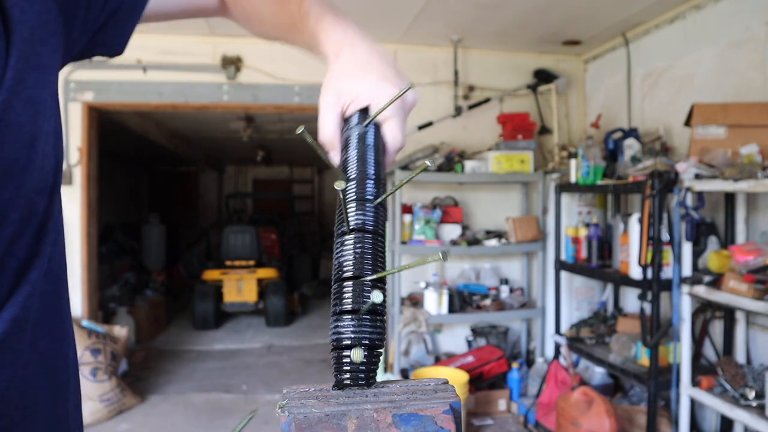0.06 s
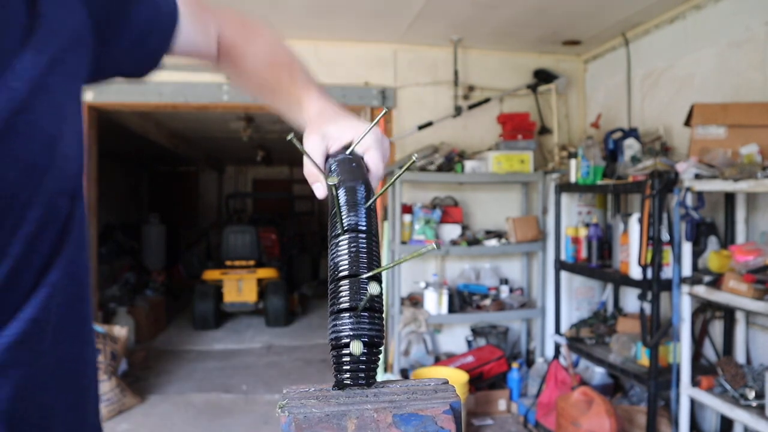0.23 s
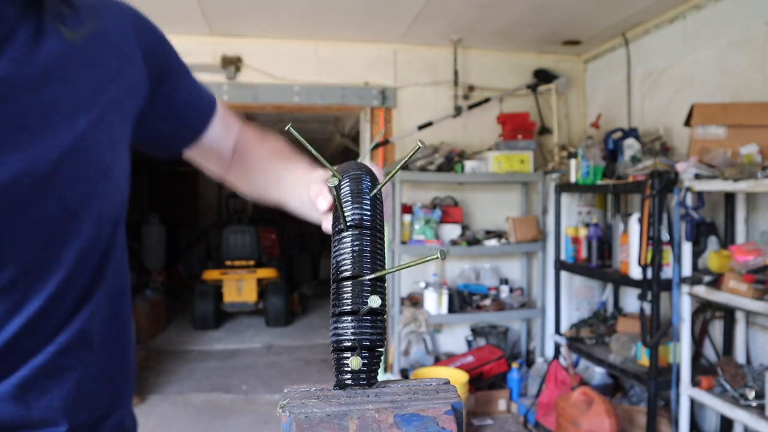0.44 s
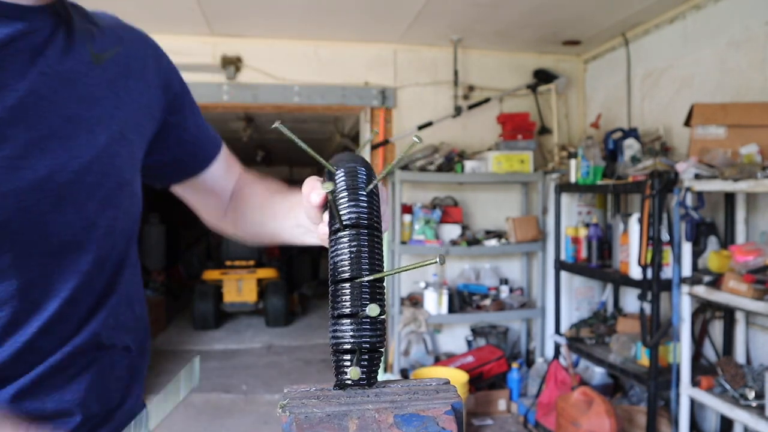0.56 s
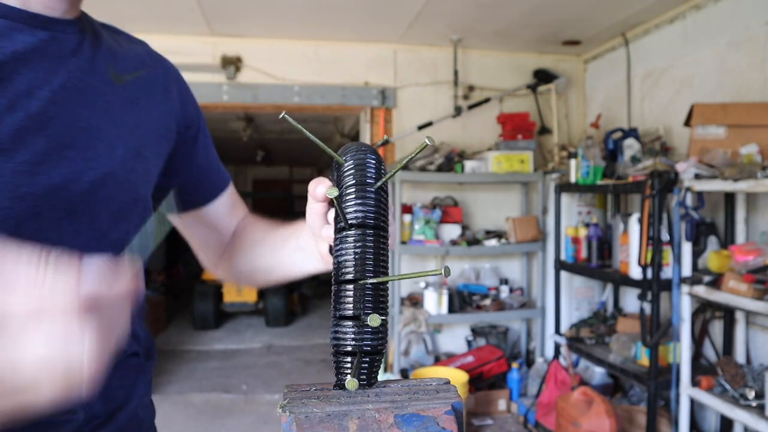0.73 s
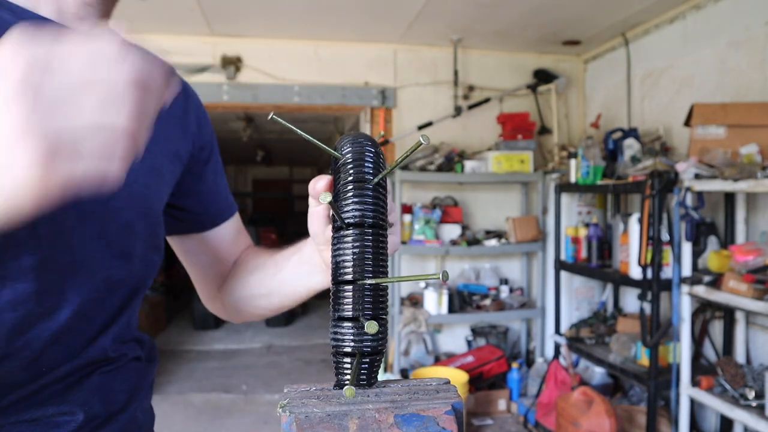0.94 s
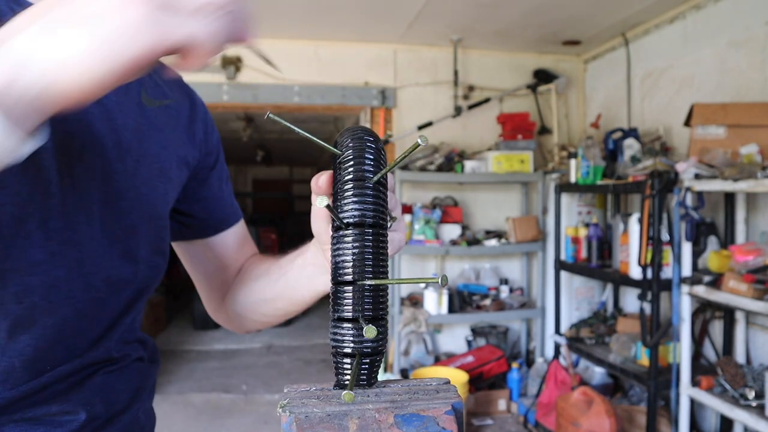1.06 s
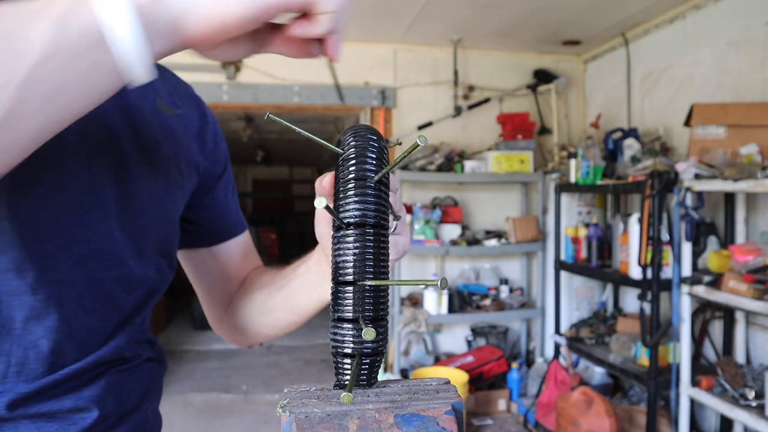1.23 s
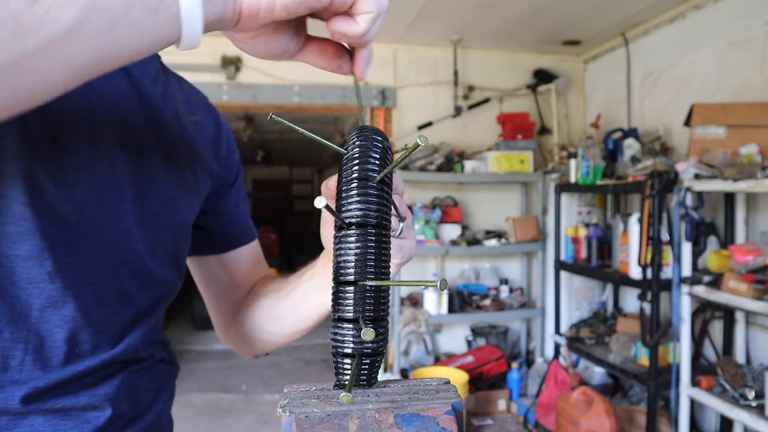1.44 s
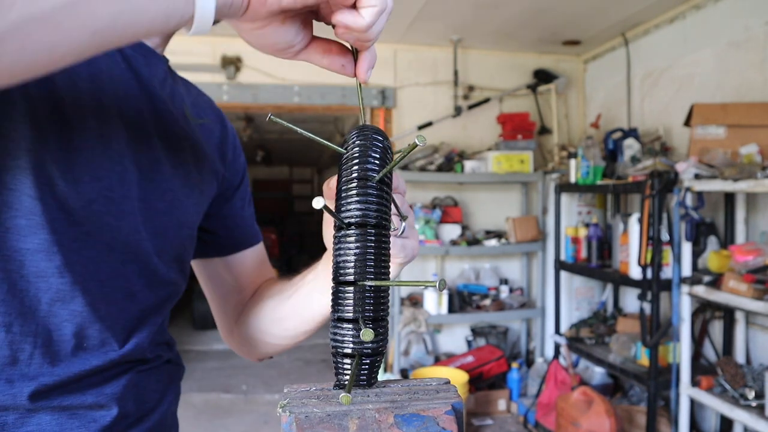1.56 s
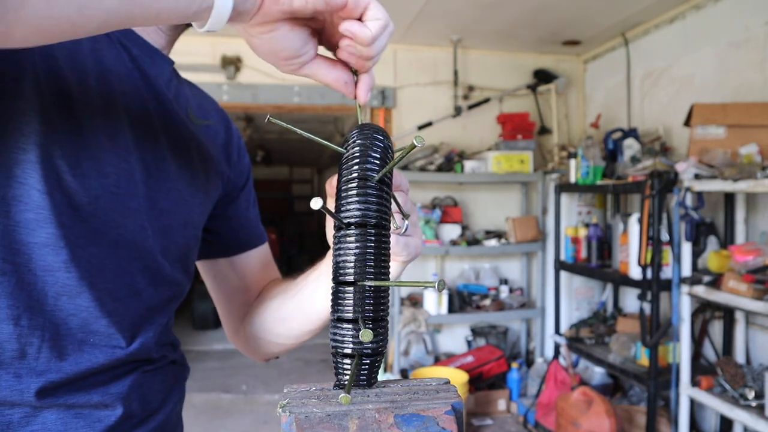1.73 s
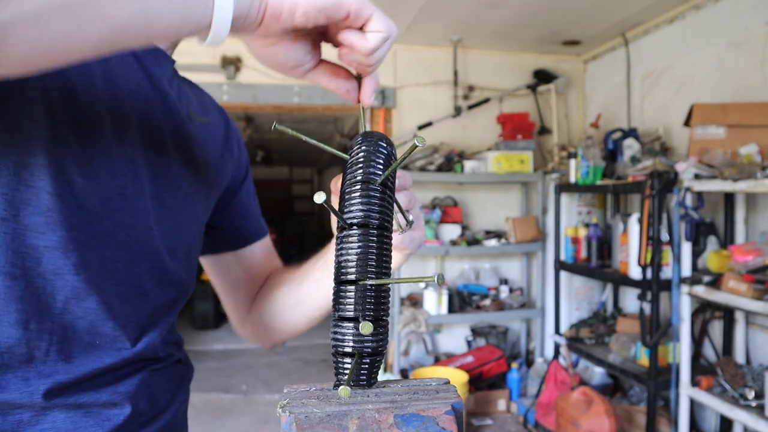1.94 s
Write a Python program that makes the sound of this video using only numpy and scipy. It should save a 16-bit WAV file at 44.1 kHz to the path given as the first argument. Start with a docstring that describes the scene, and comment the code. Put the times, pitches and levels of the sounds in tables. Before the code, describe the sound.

Sharp ringing snaps from a steel spring being bent by hand, followed by faint rubbing.

```python
"""A steel coil spring clamped in a vice is bent over by hand in a quiet garage workshop.
First its turns scrape and groan. From 0.26 to 0.7 s they slip past each other in sharp snaps that
ring the wire and set the spring wobbling, with hollow knocks and dull thuds against the hand.
A duller clink follows at 0.87 s. Then the hand shifts its grip: quiet rubbing, soft taps, small
ticks and a faint squeak, over a low throb that lingers to the end."""
import sys
import numpy as np
from scipy import signal
from scipy.fft import rfft, irfft
from scipy.io import wavfile
from scipy.ndimage import uniform_filter1d

SR = 44100
rng = np.random.default_rng(int(sys.argv[2]) if len(sys.argv) > 2 else 0)


def file_out(sig):
    """Save sig as 16-bit WAV at sys.argv[1]."""
    # one column per channel
    cols = np.atleast_2d(sig).T
    # limit, then scale
    lim = np.clip(cols, -1, 1)
    pcm = np.round(lim * 32767).astype(np.int16)
    wavfile.write(sys.argv[1], SR, pcm)


N = 88200
BURST_GAIN_DB = 17  # added to the levels of ticks and snaps


def amp(db):
    """Decibels to gain."""
    return 10 ** (np.asarray(db) / 20)


def unit(x):
    """Scales to rms 1."""
    return x / np.sqrt(np.mean(x ** 2) + 1e-20)


def curve_at(points, hz):
    """Reads a curve on a log-frequency axis."""
    f, value = np.transpose(points)
    return np.interp(np.log(hz + 1), np.log(f + 1), value)


def fader(points):
    """Level automation as a gain for every sample, silent outside its points."""
    s, db = np.transpose(points)[:2]
    return amp(np.interp(np.arange(N) / SR, s, db, left=-120, right=-120))


def add(mix, s, sound):
    """Mixes a sound in at time s."""
    part = mix[max(round(s * SR), 0):][:len(sound)]
    part += sound[:len(part)]


def eq(x, points, size=4096):
    """Minimum-phase EQ through points of (frequency [Hz], gain [dB])."""
    hz = abs(np.fft.fftfreq(size, 1 / SR))
    log_gain = np.log(amp(curve_at(points, hz)))
    response = np.exp(np.conj(signal.hilbert(log_gain)))
    impulse = np.fft.ifft(response).real[:size // 2]
    return signal.fftconvolve(x, impulse)[:len(x)]


def resonate(x, hz, width_hz):
    """A resonance of gain 1, steady or gliding."""
    carrier = np.exp(2j * np.pi * np.cumsum(hz * np.ones(len(x))) / SR)
    pole = np.exp(-np.pi * width_hz / SR)
    return 2 * (carrier * signal.lfilter([1 - pole], [1, -pole], x / carrier + 1e-18)).real


def steep_band(x, hz, width_hz):
    """Two equal resonances in series."""
    return resonate(resonate(x, hz, width_hz), hz, width_hz)


def waver(hz, drift_hz):
    """A tone of steady strength whose pitch wanders by drift_hz rms."""
    drift = unit(uniform_filter1d(rng.standard_normal(N), size=700))
    return np.sqrt(2) * np.sin(2 * np.pi * (np.cumsum(hz + drift_hz * drift) / SR + rng.random()))


def stick_slip(per_s, spread_db):
    """Friction: random tiny impulses, a few of them large."""
    size = amp(spread_db * np.minimum(rng.exponential(1, N), 4))
    return size * rng.choice([-1, 1], N) * (rng.random(N) < per_s / SR)


def burst(decay_s, size=2048):
    """One slip: a dying chatter of contacts, whitened and scaled to energy 1."""
    fade = np.exp(-(np.arange(size) / SR / decay_s))
    spectrum = rfft(rng.standard_normal(size) * fade)
    chatter = irfft(spectrum / (abs(spectrum) + 1e-9)) * np.sqrt(fade)
    return chatter / np.linalg.norm(chatter)


def hit_envelope(t, attack_s, decay_s):
    """A rounded attack into an exponential decay."""
    return (1 - np.exp(-t / attack_s)) * np.exp(-t / decay_s)


# room tone EQ: (frequency [Hz], gain [dB])
ROOM_TONE_EQ = [(30, 0.5), (100, -4), (250, -6), (700, -11), (1200, -15.5), (4000, -18.5), (16000, -23.5)]

def room_tone(level_db=-54.5):
    """A quiet bed of dark noise."""
    return amp(level_db) * unit(eq(rng.standard_normal(N), ROOM_TONE_EQ))


# reverb time: (frequency [Hz], t60 [s])
GARAGE_DECAY = [(100, 0.69), (500, 0.28), (1500, .3), (4000, 0.33), (7000, 0.29), (16000, 0.22)]
# reverb return EQ: (frequency [Hz], gain [dB])
GARAGE_EQ = [(100, -3.5), (400, 3), (1000, -2), (3000, -1), (5500, 1.5), (8000, -2), (12000, -1)]

def garage(send, return_db=-10.5, gap_s=.004, echoes_per_s=4000):
    """Scattered reflections from shelves and walls, each band dying at its own speed."""
    echoes = rng.standard_normal(SR) * (rng.random(SR) < echoes_per_s / SR)
    hz, t, bands = signal.stft(echoes, SR, nperseg=256)
    fade = amp(-60 * t / curve_at(GARAGE_DECAY, hz)[:, None])
    tail = signal.istft(bands * fade, SR, nperseg=256)[1]
    tail *= np.arange(len(tail)) / SR > gap_s
    wet = signal.fftconvolve(send, tail / np.linalg.norm(tail))[:N]
    return amp(return_db) * eq(wet, GARAGE_EQ)


# throb fader: (time [s], level [dB])
THROB_FADER = [(1.0, -58.5), (1.48, -64.5), (1.58, -51), (1.66, -65), (1.74, -53), (1.85, -50.5), (2, -58)]

def throb():
    """A faint low throb under the quiet handling."""
    return fader(THROB_FADER) * waver(hz=51, drift_hz=4.2)


# rub fader: (time [s], level [dB])
RUB_FADER = [(.95, -67), (1.19, -59), (1.26, -50), (1.34, -54), (1.41, -56), (1.45, -54), (1.53, -59.5),
             (1.66, -68)]
# rub EQ: (frequency [Hz], gain [dB])
RUB_EQ = [(100, -13), (350, -7), (650, -0.5), (900, -2.5), (1700, -9), (2600, -7), (3800, -14.5),
          (7000, -13.5), (10000, -22), (16000, -25)]

def rub():
    """Friction of the hand sliding along the coil."""
    return fader(RUB_FADER) * unit(eq(stick_slip(per_s=2500, spread_db=2.0), RUB_EQ))


def squeak(peak_s=1.339, swell_s=.032, level_db=-50.5):
    """The hand squeaks faintly on the coil: a swell of narrow-band noise."""
    swell = np.exp(-((np.arange(N) / SR - peak_s) / swell_s) ** 2)
    return amp(level_db) * swell * unit(steep_band(rng.standard_normal(N), hz=638, width_hz=100))


# tap cues: (time [s], level [dB], pitch [Hz])
TAP_CUES = [(1.2065, -37.5, 475), (1.294, -32, 410), (1.300, -42.5, 560), (1.433, -43, 444),
            (1.461, -40, 300), (1.502, -42, 320), (1.58, -44.5, 325), (1.622, -41, 390)]
# EQ of the grit in a tap: (frequency [Hz], gain [dB])
TAP_EQ = [(100, -7), (350, 5), (700, -3), (1400, -11.5), (2500, -16), (8000, -46)]

def taps(decay_s=.0038, grit_mix=.68):
    """Soft taps of the shifting hand, each a blip of tone and dull grit."""
    out, t = np.zeros(N), np.arange(2048) / SR
    for s, db, hz in TAP_CUES:
        grit = unit(eq(rng.standard_normal(len(t)), TAP_EQ))
        add(out, s, amp(db) * np.exp(-t / decay_s) * (np.sin(2 * np.pi * hz * t) + grit_mix * grit))
    return out


# tick cues: (time [s], relative level [dB], band centre [Hz])
TICK_CUES = [(1.109, -40, 2620), (1.393, -41, 8100), (1.514, -40.5, 2280), (1.548, -40.5, 5470)]

def ticks():
    """Tiny contacts between turns and nails."""
    out = np.zeros(N)
    for s, db, hz in TICK_CUES:
        add(out, s, amp(db + BURST_GAIN_DB) * resonate(burst(decay_s=.0036), hz, width_hz=1900))
    return out


# thud cues: (time [s], level [dB], pitch [Hz], decay [s])
THUD_CUES = [(0.454, -32.5, 144, 0.011), (0.613, -41, 134, 0.0095), (.764, -31.5, 98, 0.011)]

def thuds(attack_s=.004):
    """The coil bumps against the hand, soft and low."""
    out, t = np.zeros(N), np.arange(SR // 8) / SR
    for s, db, hz, decay_s in THUD_CUES:
        add(out, s, amp(db) * hit_envelope(t, attack_s, decay_s) * np.sin(2 * np.pi * hz * t))
    return out


# slow bending modes: (frequency [Hz], drift [Hz], relative level [dB])
BENDING_MODES = [(27.32, 3, 1.5), (57.03, 10.3, 4.5), (84.7, 5.7, -1), (160, 30, -14.5),
                 (221.6, 49.2, -13.5)]
# wobble fader: (time [s], level [dB])
WOBBLE_FADER = [(0, -59.5), (.18, -46.5), (.29, -50), (.34, -32.5), (.4, -30), (.51, -37.5), (.61, -32.5),
                (.72, -37), (.84, -47.5), (.92, -45.5), (.98, -57.5), (1.15, -59)]

def wobble():
    """The low end: the whole spring shudders in its bending modes."""
    sway = sum(amp(db) * waver(hz, drift_hz) for hz, drift_hz, db in BENDING_MODES)
    return fader(WOBBLE_FADER) * unit(sway)


# modes of the clink: (frequency [Hz], relative level [dB], t60 [s])
CLINK_MODES = [(435, -10.5, 0.052), (890, -17, 0.19), (978, -4, 0.093), (1213, 0, 0.15), (1248, -2, 0.074),
               (1770, -11, 0.027), (2336, -12, 0.067), (2683, -5, 0.046), (2860, -2, 0.041),
               (4500, -5.5, 0.011)]

def clink(start_s=.8682, ring_db=-31, attack_db=-5.5):
    """A damped knock of metal on metal: a tick on top of a clangy ring of several modes."""
    out, t = np.zeros(N), np.arange(SR // 2) / SR
    ring = sum(amp(db - 60 * t / t60) * np.sin(2 * np.pi * hz * t) for hz, db, t60 in CLINK_MODES)
    attack_eq = [(200, -16), (700, -26), (1200, 9), (3000, 5),
                 (6800, -21.5), (9000, 1.5), (10500, -14), (15000, -8)]
    add(out, start_s, amp(ring_db) * ring)
    add(out, start_s, amp(attack_db) * eq(burst(decay_s=.00068), attack_eq))
    return out


# scrape fader: (time [s], level [dB])
SCRAPE_FADER = [(0, -56), (.08, -51), (.15, -45.5), (.19, -35.5), (.225, -33), (.25, -23.5), (.27, -30),
                (.282, -26), (.32, -38.5), (.42, -45), (.5, -48.5), (.56, -46)]
# scrape EQ: (frequency [Hz], gain [dB])
SCRAPE_EQ = [(100, -11.5), (330, 8.5), (700, 4.5), (1500, 2.5), (2400, 1), (3600, -3.5), (5500, -0.5),
             (7500, -2.5), (10500, -13.5), (16000, -21)]

def scrape():
    """Turns grind on each other, building up to the first snaps and then easing off."""
    return fader(SCRAPE_FADER) * unit(eq(stick_slip(per_s=1800, spread_db=1), SCRAPE_EQ))


# groan automation: (time [s], level [dB], pitch [Hz])
GROAN_CURVE = [(.17, -63, 360), (0.201, -40.5, 357.7), (0.229, -37, 375), (.245, -27.5, 373.2),
               (.262, -27.5, 370), (.29, -42, 362), (.32, -74, 347)]

def groan(rasp_mix=.14):
    """The bent coil groans briefly: a wavering tone with a rasp at the same pitch."""
    s, _, hz = np.transpose(GROAN_CURVE)
    pitch = np.interp(np.arange(N) / SR, s, hz)
    rasp = unit(resonate(rng.standard_normal(N), pitch, width_hz=83))
    return fader(GROAN_CURVE) * (waver(pitch, drift_hz=3.8) + rasp_mix * rasp)


# knock cues: (time [s], level [dB], pitch [Hz], decay [s])
KNOCK_CUES = [(0.3387, -13.5, 1548, .006), (0.345, -17.5, 1820, 0.0055), (.350, -30, 975, 0.0076),
              (.384, -18.5, 1947, 0.0048), (.3855, -16.5, 911, 0.0062), (.4480, -34, 929, 0.021),
              (0.4488, -29, 1820, 0.0052), (.562, -25, 695, 0.0056), (0.69, -26, 378, 0.0032)]

def knocks(attack_s=.00097, grain_mix=.21):
    """Turns close up after a slip with short, hollow, slightly grainy knocks."""
    out, t = np.zeros(N), np.arange(SR // 10) / SR
    for s, db, hz, decay_s in KNOCK_CUES:
        grain = unit(resonate(rng.standard_normal(len(t)), hz, width_hz=390))
        body = np.sin(2 * np.pi * hz * t) + grain_mix * grain
        add(out, s, amp(db) * hit_envelope(t, attack_s, decay_s) * body)
    return out


def chirp(start_hz=1080.6, first_octave_s=.019, smear_s=.0019):
    """A falling chirp: bending waves run along the wire, highs first, and scatter where turns touch."""
    t = np.arange(SR // 10) / SR
    hz = start_hz / (1 + t / first_octave_s)
    wave = hit_envelope(t, attack_s=.0047, decay_s=.018) * np.sin(2 * np.pi * np.cumsum(hz) / SR)
    scatter = rng.standard_normal(len(t)) * np.exp(-t / smear_s)
    smeared = signal.fftconvolve(wave, scatter / np.linalg.norm(scatter))[:len(t)]
    return .61 * wave + .54 * smeared


# mode clusters of the wire: (centre [Hz], width [Hz], relative level [dB], t60 [s])
WIRE_CLUSTERS = [(517.8, 200, -11.5, 0.18), (908, 110, -12, 0.27), (1243, 250, -11, 0.29),
                 (1598, 181, -3, 0.15), (1962, 430, 2, 0.089), (4330, 300, -2, 0.067),
                 (5650, 510, -11, 0.12), (6400, 550, 2.5, 0.16), (6820, 500, -5.5, 0.23),
                 (7190, 1100, -21.5, 0.15)]

def wire_ring(blows, gain_db=-6.5, modes=9):
    """Blows ring the wire in clusters of close, beating modes."""
    t, ring = np.arange(SR // 2) / SR, 0
    for hz, width_hz, db, t60 in WIRE_CLUSTERS:
        jitter, phase = rng.random((2, modes, 1))
        modes_hz = hz + width_hz * ((np.arange(modes)[:, None] + jitter) / modes - .5)
        cluster = np.sin(2 * np.pi * (modes_hz * t + phase)).sum(0)
        ring = ring + amp(db - 60 * t / t60) * cluster
    return amp(gain_db) * signal.fftconvolve(blows, ring / np.linalg.norm(ring))[:N]


# snap cues: (time [s], relative level [dB], decay [s], crack low-pass [Hz], clack pitch [Hz],
# clack send [dB], zing pitch [Hz], zing send [dB], wire send [dB], chirp level [dB])
SNAP_CUES = [(.2605, -24, .0014, 15000, 1600, -16, 6400, 4, -6, -47),
             (0.267, -18, 0.0033, 14900, 2000, -9, 6400, 7, -9, -27),
             (0.287, -29, .001, 15000, 2350, 1, 6400, -9, -6, -54),
             (.2900, -18.5, .0013, 13900, 2440, 11, 5100, 9.5, -2, -44),
             (.2930, -15.5, 0.0013, 14800, 1270, -14, 5200, 1, -5, -43),
             (0.305, -20.5, 0.002, 14000, 1600, -19, 6300, 14, -3, -30.5),
             (0.3344, -14.5, 0.0013, 11000, 1620, -1, 6400, -10, 9.5, -56),
             (.3388, -7, 0.0012, 10800, 1550, -6.5, 6450, 8.5, -0.5, -28.5),
             (.3406, -11.5, .002, 13900, 1760, -6, 6400, 10, 0, -21.5),
             (0.345, -20.5, 0.0041, 10000, 1780, 15, 6400, 9, 9, -27.5),
             (.3744, -11, 0.00049, 15900, 1780, 1, 6600, -2, -2, -38),
             (.3760, -12, .001, 14100, 1770, 8, 6320, 11, 3.5, -28),
             (.3830, -19, 0.0025, 16000, 1820, 6, 4440, 12.5, -11, -32),
             (0.411, -29, 0.0013, 13000, 1900, -19, 6400, 7, -18, -35),
             (0.4472, -23.5, 0.0016, 13700, 1850, 5.5, 8400, -2, 0, -29.5),
             (.5594, -20, 0.003, 11900, 1480, 16.5, 4150, -1, -11, -35),
             (.5933, -17.5, 0.0016, 8950, 1740, 15, 5010, 13.5, 3, -28.5),
             (0.675, -12, 0.0018, 10000, 1500, 5, 4860, 8.5, -13, -28.5)]
# crack EQ: (frequency [Hz], gain [dB])
CRACK_EQ = [(100, -11.5), (400, -4), (1000, 1.5), (2000, -1), (3200, -1.5), (5500, 1), (8500, 2.5),
            (10500, -8), (13500, 2), (16000, 3)]

def snaps(room_zing_db=-13.5):
    """Turns jump past each other. Returns the body (crack, clack, chirp, ring), close zing, room zing."""
    body, close_zing, room_zing, blows = np.zeros((4, N))
    for s, db, decay_s, top_hz, clack_hz, clack_db, zing_hz, zing_db, wire_db, chirp_db in SNAP_CUES:
        jolt = amp(db + BURST_GAIN_DB) * burst(decay_s)
        low_pass = signal.butter(2, top_hz, fs=SR, output="sos")
        crack = signal.sosfilt(low_pass, eq(jolt, CRACK_EQ))
        clack = amp(clack_db) * resonate(jolt, clack_hz, width_hz=390)
        add(body, s, crack + clack)
        add(body, s, amp(chirp_db) * chirp())
        add(close_zing, s, amp(zing_db) * steep_band(jolt, zing_hz, width_hz=1300))
        # the room hears the zing from all sides of the coil, as a broader band
        add(room_zing, s, amp(zing_db + room_zing_db) * steep_band(jolt, zing_hz, width_hz=3500))
        add(blows, s, amp(wire_db) * jolt)
    return body + wire_ring(blows), close_zing, room_zing


def scene():
    """Mono mix: the spring up close, garage reverb around it, dry low end and room tone beneath."""
    snap_body, close_zing, room_zing = snaps()
    close = snap_body + knocks() + scrape() + groan() + clink()
    close += rub() + squeak() + taps() + ticks() + thuds()
    bed = room_tone()
    reverb = garage(close + room_zing)
    return (close + close_zing + reverb + wobble() + throb() + bed)[None]


def record(dry, ceiling=.82, top_hz=15900):
    """Master chain: a soft clip rounds the tallest peaks, then a steep low-pass trims the top."""
    rounded = dry / (1 + (dry / ceiling) ** 4) ** .25
    low_pass = signal.firwin(511, top_hz, window=("kaiser", 9), fs=SR)
    return signal.oaconvolve(rounded, low_pass[None], "same")


dry = scene()
out = record(dry)
file_out(out)
```